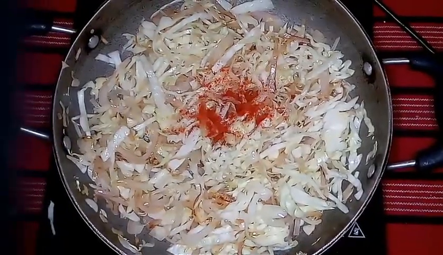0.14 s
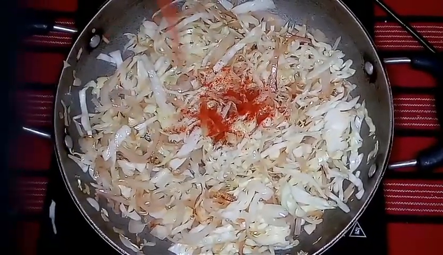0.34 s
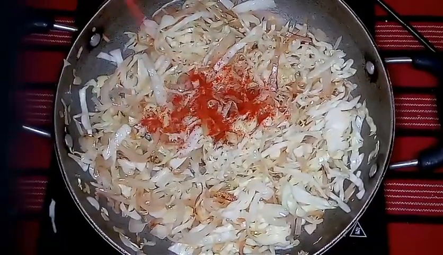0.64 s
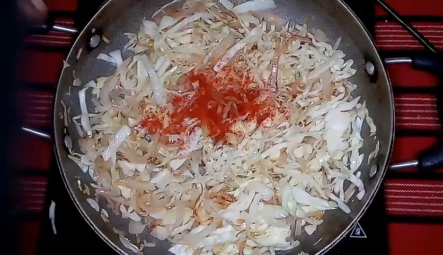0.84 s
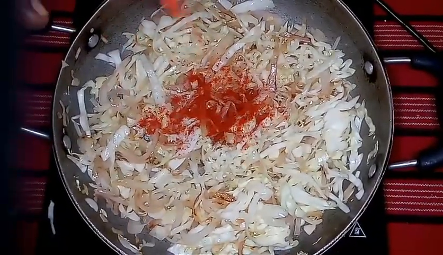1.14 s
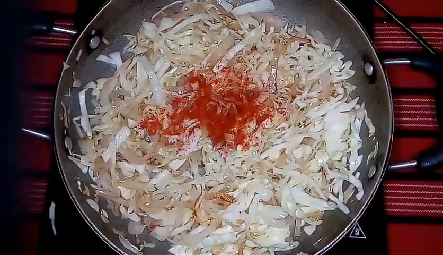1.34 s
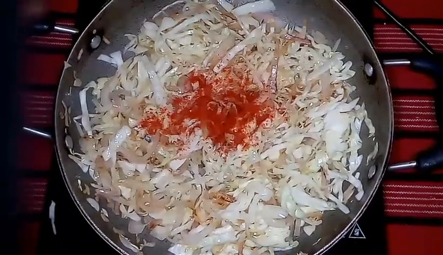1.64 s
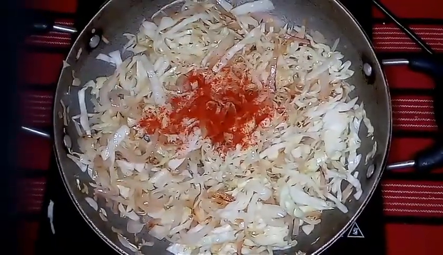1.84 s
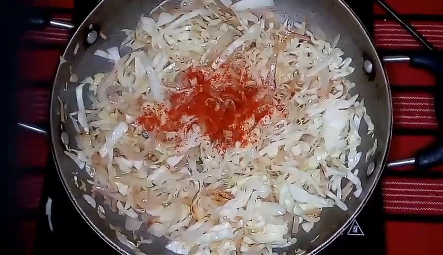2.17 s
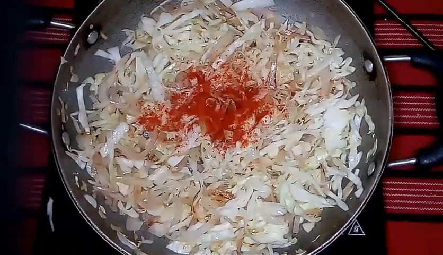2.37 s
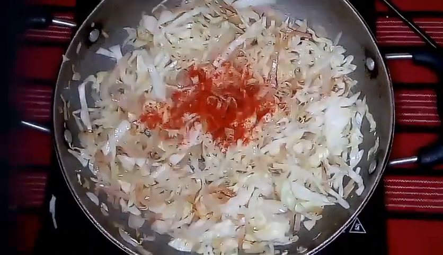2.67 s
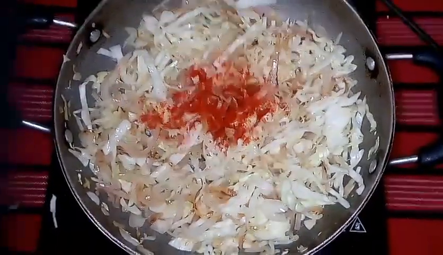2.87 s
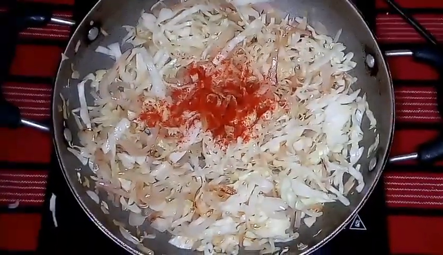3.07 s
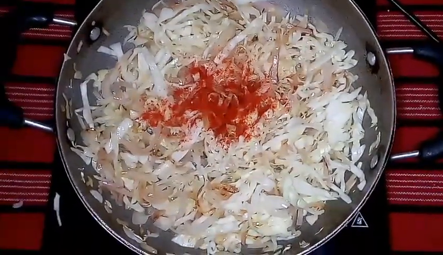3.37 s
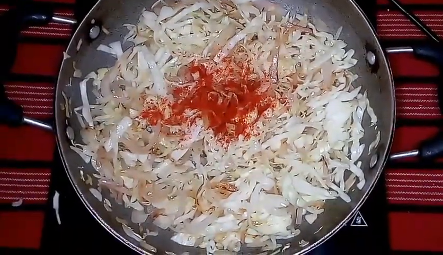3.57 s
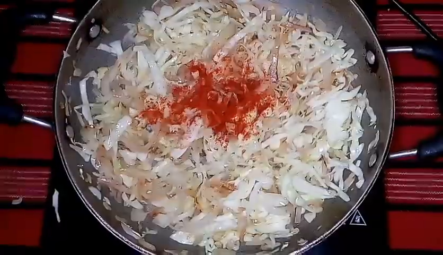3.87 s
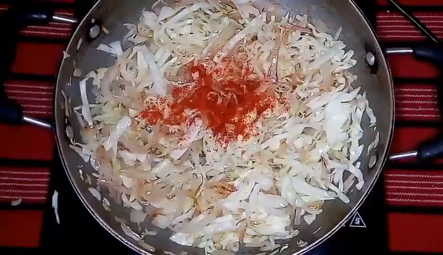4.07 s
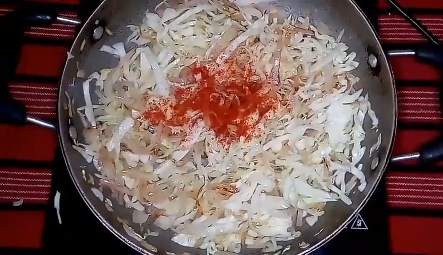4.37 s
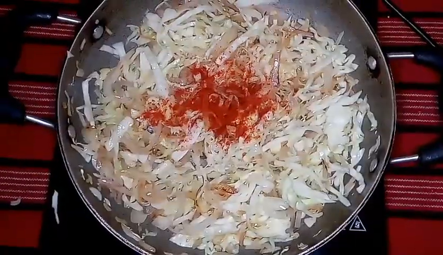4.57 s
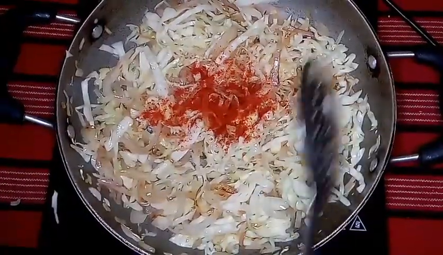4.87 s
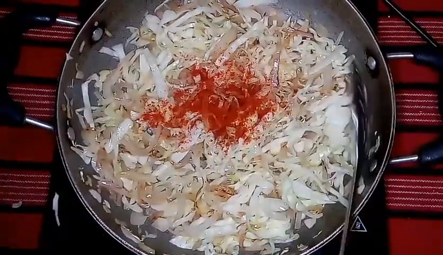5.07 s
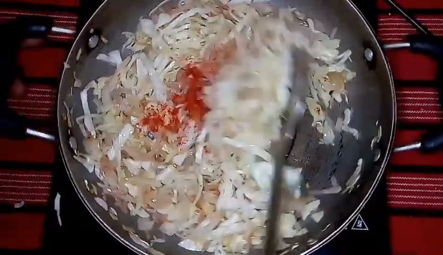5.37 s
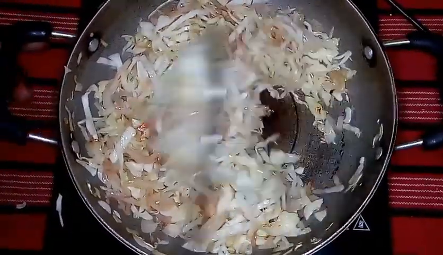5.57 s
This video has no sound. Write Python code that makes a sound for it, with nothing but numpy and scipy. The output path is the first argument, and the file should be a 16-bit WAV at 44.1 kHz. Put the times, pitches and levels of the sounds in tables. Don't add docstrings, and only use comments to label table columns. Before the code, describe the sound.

A steady kitchen bed: low coil hum, hollow fan airflow and dense bright frying, heard in mono by one close microphone with little room sound. Sharp fat pops come singly and in small clusters, with a few dull bumps midway. In the last half second a metal utensil hits the pan, rattles briefly, slides with low knocks and shoves food over hot steel.

```python
import sys
import numpy as np
from scipy import signal
from scipy.fft import rfft, irfft, next_fast_len
from scipy.io import wavfile

SR = 44100
rng = np.random.default_rng(int(sys.argv[2]) if len(sys.argv) > 2 else 0)


def log_audio(samples):
    frames = np.atleast_2d(samples).T
    limited = np.clip(frames, -1, 1)
    pcm = np.round(limited * 32767).astype(np.int16)
    wavfile.write(sys.argv[1], SR, pcm)


N = 252290

SLIDE_START_S = 5.25

# pitch in Hz, level in dB, 60 dB decay in seconds.
PAN_MODES = [(678, 1, 0.036), (900, -5.5, 0.035), (1060, -9, 0.068), (1207, -2, 0.052), (1347, -3, 0.04),
             (1542, -11, 0.12), (1990, -5, 0.057), (2170, -6.5, 0.054)]


def undb(db):
    return 10 ** (np.asarray(db) / 20)


def rms_one(x):
    return x / np.sqrt(np.mean(x ** 2) + 1e-20)


def in_time(rows):
    s, *columns = np.transpose(rows)
    return [np.interp(np.arange(N) / SR, s, c) for c in columns]


def drift(rate_hz):
    r = np.exp(-2 * np.pi * rate_hz * 40 / SR)
    noise = rng.standard_normal(N // 40 + 2002)
    slow = signal.lfilter([1], [1, -2 * r, r * r], noise)[2000:]
    return np.interp(np.arange(N) / 40, np.arange(len(slow)), rms_one(slow))


def colour(x, spectrum):
    size = next_fast_len(N)
    hz, db = np.transpose(spectrum)
    log_hz = np.log(np.fft.rfftfreq(size, 1 / SR) + 1)
    gain = undb(np.interp(log_hz, np.log(hz), db))
    return rms_one(irfft(rfft(x, size) * gain, size)[:N])


def resonance(x, hz, width_hz):
    r = np.exp(-np.pi * width_hz / SR)
    feedback = [1, -2 * r * np.cos(2 * np.pi * hz / SR), r * r]
    return signal.lfilter(np.array([1, 0, -1]) * (1 - r * r) / 2, feedback, x)


def ring(clicks, hz, t60):
    r = undb(-60 / (t60 * SR))
    w = 2 * np.pi * hz / SR
    return signal.lfilter([0, np.sin(w)], [1, -2 * r * np.cos(w), r * r], clicks + 1e-18)


def grains(per_s, spread_db):
    sizes = undb(spread_db * np.minimum(rng.exponential(1, N), 5)) * rng.choice([-1, 1], N)
    return sizes * (rng.random(N) < per_s / SR)


def knock(db, hz, swell_ms):
    t = np.arange(round(0.15 * SR)) / SR
    u = t * 1000 / swell_ms
    return undb(db) * u * np.exp(1 - u) * np.sin(2 * np.pi * hz * t)


def tone(hz, wobble_hz):
    cycles = np.cumsum(hz + wobble_hz * drift(2.82)) / SR
    return np.sqrt(2) * np.sin(2 * np.pi * (cycles + rng.random()))


def soften(x, low_hz, high_hz):
    return signal.sosfilt(signal.butter(3, [low_hz, high_hz], "band", fs=SR, output="sos"), x)


def place(sound, s):
    return np.pad(sound, (round(s * SR), N))[:N]


def coil_hum():
    # time in seconds, hum level in dB.
    coil = [(0.0, -39.5), (2.2, -40), (2.35, -42), (2.6, -40.5), (3.5, -42), (4.3, -42), (4.9, -41),
            (5.21, -40), (5.28, -48.5), (5.36, -38.5), (5.45, -45.5), (5.64, -45.5), (5.72, -39)]
    hum_db, = in_time(coil)
    return undb(hum_db + 0.2 * drift(2.1)) * tone(100, wobble_hz=0.11)


def fan():
    # frequency in Hz, level in dB per Hz.
    air_spectrum = [(12, -65), (20, -31), (43, -18), (63, -18.5), (97, -8), (123, -10), (149, -15.5),
                    (193, -14.5), (325, -15), (403, -16), (479, -9.5), (546, -13), (1140, -18.5),
                    (1470, -48), (3500, -19), (4550, -59), (7700, -120)]
    # pitch in Hz, width in Hz, level in dB.
    cavities = [(330, 20, 13.5), (369, 11, 8), (400, 11, 1.5), (451.6, 27, 2.5), (500, 53, 2),
                (611, 57, -0.5), (767, 38, -0.5), (840, 8.6, -19), (944, 24, -4.5), (1025, 21, 2),
                (1430, 43, -5)]
    # pitch in Hz, width in Hz, share removed from 0 to 1.
    swallowing = (539, 23, 1)
    steady_hz = [128, 147, 1129]
    # level in dB, pitch wobble in Hz.
    steady_tones = [(-66, 2.4), (-61.5, 0.76), (-62.5, 1.63)]
    blade_levels = [-68, -60, -68.5, -69]
    blade_hz = 247.1

    air = colour(rng.standard_normal(N), air_spectrum)
    air = air + sum(undb(db) * resonance(air, hz, width) for hz, width, db in cavities)
    dip_hz, dip_width, share = swallowing
    air = air - np.clip(share, 0, 1) * resonance(air, dip_hz, dip_width)

    lines = [(hz, db, wobble) for hz, (db, wobble) in zip(steady_hz, steady_tones)]
    lines += [(blade_hz * (k + 1), db, 1.2) for k, db in enumerate(blade_levels)]
    tones = sum(undb(db + 1.2 * drift(1.9)) * tone(hz, wobble) for hz, db, wobble in lines)
    return undb(-47 + 0.77 * drift(8.5)) * rms_one(air) + tones


def sizzle():
    # time in seconds, sizzle level in dB.
    frying = [(0.0, -38.5), (0.6, -38.5), (1.4, -39.5), (2.5, -39.5), (3.1, -38.5), (4.1, -39.5),
              (4.9, -39), (5.2, -38.5), (5.72, -37.5)]
    # frequency in Hz, level in dB per Hz.
    sizzle_spectrum = [(760, -31), (1300, -12), (1470, -18), (1910, -15.5), (2320, -16), (3070, -12),
                       (3410, -9), (4370, -1.5), (6090, 0.5), (6620, -3), (8060, -14.5), (11800, -29.5),
                       (13700, -33.5), (15500, -43)]
    sizzle_db, = in_time(frying)

    bared = np.clip((np.arange(N) / SR - 5.35) / 0.15, 0, 1)
    sparkle_db = 5 * bared + 2.3 * drift(12.0)

    flurry = drift(12.0)
    common = rms_one(grains(7000, spread_db=4.4))
    edges_hz = np.geomspace(700, 17000, 10)
    fizz = 0
    for low_hz, high_hz in zip(edges_hz, edges_hz[1:]):
        source = common + rms_one(grains(6000, spread_db=2.0))
        band_filter = signal.butter(2, [low_hz, high_hz], "band", fs=SR, output="sos")
        swing_db = 0.42 * flurry + 0.16 * drift(8.3) * np.log(low_hz / 600)
        swing_db = swing_db + sparkle_db * (low_hz > 10000)
        fizz = fizz + undb(swing_db) * signal.sosfilt(band_filter, source)

    pops = grains(900, spread_db=2.5)
    dealt = rng.integers(0, 24, N)
    rings = 0
    for k, hz in enumerate(np.geomspace(1500, 14000, 24)):
        rings = rings + ring(pops * (dealt == k), hz, t60=176 / hz) * np.sqrt(hz)
    return undb(sizzle_db) * colour(rms_one(fizz) + undb(-12) * rms_one(rings), sizzle_spectrum)


def spits():
    # start in seconds, peak level in dB, pitch in Hz.
    drops = [(0.2003, -28, 6410), (0.3476, -21, 4800), (0.494, -26, 3600), (0.4526, -18, 6030),
             (0.641, -23, 5490), (0.699, -20, 5460), (0.8377, -23, 4780), (0.94, -24, 5600),
             (1.4643, -24, 6330), (1.632, -24, 5400), (2.0844, -16.5, 5600), (2.2444, -24, 5430),
             (2.2934, -24, 5400), (2.343, -22, 5230), (2.3891, -16, 5550), (3.1297, -28, 5720),
             (3.1926, -21, 4900), (3.358, -17, 5600), (3.46, -19, 6300), (3.4955, -21, 5330),
             (3.925, -21, 5770), (4.462, -21, 6200), (4.485, -22, 5600), (5.2542, -11.5, 5300),
             (5.3542, -23, 5850), (5.4257, -20, 4170), (5.4383, -26, 6420), (5.5702, -30, 4600),
             (5.5799, -22, 5140), (5.6829, -23, 5060)]
    puff_ms = 1.6
    out = 0
    for s, db, hz in drops:
        crack = knock(db - 0.6, hz, swell_ms=0.12)
        t_ms = np.arange(len(crack)) / SR * 1000
        puff = undb(db - 13) * rng.standard_normal(len(crack)) * np.exp(-t_ms / puff_ms)
        edge_db = db - 30 + 1.5 * (s > SLIDE_START_S)
        edge = knock(edge_db, 11500, swell_ms=0.035)
        out = out + place(soften(crack, 1900, 8600) + soften(puff, 4200, 5500) + edge, s)
    return out


def pushes():
    # start in seconds, peak level in dB, pitch in Hz, swell in ms.
    thuds = [(2.085, -42, 432, 9.2), (3.075, -40, 320, 4.9), (5.22, -46.5, 200, 20.0),
             (4.043, -37.5, 373, 3.1), (4.334, -36, 277, 2.6), (5.190, -18.5, 438, 5.2),
             (5.204, -24.5, 405, 5.1), (5.2235, -25, 5023, 1.6), (5.21, -52, 45, 30.0),
             (5.392, -33.5, 88, 9.1), (5.39, -43, 206, 14)]
    return sum(place(knock(db, hz, swell_ms), s) for s, db, hz, swell_ms in thuds)


def blows():
    # start in seconds, body level in dB, clink level in dB, chatter in ms.
    strikes = [
        (5.186, -32.5, -24.5, 4.1),
        (5.204, -35, -35, 4.5),
        (5.2237, -35, -25.5, 1.2),
        (5.379, -51, -42, 2),
        (5.396, -36.5, -38, 4.8),
    ]
    # pitch in Hz, level in dB, 60 dB decay in seconds.
    rim_modes = [(2540, -9, .012), (4400, -1, 0.0069), (5023, -8, 0.04), (5650, 2, 0.014),
                 (6300, -11, 0.014), (7260, -9, 0.018), (8960, -16.5, 0.012)]
    out = 0
    for s, body_db, clink_db, chatter_ms in strikes:
        t_ms = np.arange(round(0.3 * SR)) / SR * 1000
        chatter = rng.standard_normal(len(t_ms)) * np.exp(-t_ms / chatter_ms)
        chatter = chatter / np.sqrt(np.sum(chatter ** 2))
        body = sum(undb(body_db + db + rng.normal(0, 0.8)) * ring(chatter, hz, t60)
                   for hz, db, t60 in PAN_MODES)
        clink = sum(undb(clink_db + db + rng.normal(0, 2.3)) * ring(chatter, hz, t60)
                    for hz, db, t60 in rim_modes)
        out = out + place(body + clink, s)
    return soften(out, 740, 9800)


def blade_slips():
    # start in seconds, peak level in dB, pitch in Hz.
    releases = [
        (5.223, -30, 486),
        (5.243, -36, 384),
        (5.265, -35.5, 483),
        (5.293, -37, 433),
        (5.319, -33.5, 500),
        (5.345, -32, 433),
        (5.376, -28.5, 330),
    ]
    return sum(place(knock(db, hz, swell_ms=9.8), s) for s, db, hz in releases)


def stroke():
    # time in seconds, rustle level in dB.
    turning = [(5.25, -38), (5.285, -45), (5.35, -35.5), (5.375, -38.5), (5.43, -31), (5.47, -39),
               (5.54, -49), (5.58, -40.5), (5.72, -52)]
    # frequency in Hz, level in dB per Hz.
    rustle_spectrum = [(760, -44), (1300, -19), (1490, -26), (2090, -13), (3170, -13.5), (4070, -7.5),
                       (5610, -2.5), (6480, -6.5), (10800, -31.5), (15500, -40)]
    slide_end_s, attack_s = 5.36, 0.0085
    t = np.arange(N) / SR
    rustle_db, = in_time(turning)

    rumble_db = -39 - 87 * np.maximum(t - slide_end_s, 0)
    rumble_hz = 451.5 - 59.5 * np.maximum(t - SLIDE_START_S, 0)
    phase = 2 * np.pi * np.cumsum(rumble_hz) / SR
    rumble = rms_one(drift(59.0) * np.cos(phase) + drift(45.0) * np.sin(phase))

    stutter = grains(2500, spread_db=1.5)
    modes = sum(undb(db) * ring(stutter, hz, 0.78 * t60) for hz, db, t60 in PAN_MODES)
    grating = rms_one(modes + 53 * resonance(stutter, 1080, 90))

    rustle = colour(grains(7000 * undb(3 * drift(60.0)), spread_db=3.5), rustle_spectrum)
    food = undb(rustle_db) * (rustle + undb(-14) * grating)
    moving = np.clip((t - SLIDE_START_S) / attack_s, 0, 1)
    return moving * (undb(rumble_db) * rumble + food)


def scene():
    steady = coil_hum() + fan() + sizzle()
    mono = steady + spits() + pushes() + blows() + blade_slips() + stroke()
    return np.stack([mono, mono])


def roll_off(x):
    return signal.sosfilt(signal.butter(12, 15600, fs=SR, output="sos"), x)


def record(dry):
    top_hz = 15600
    edge = signal.cheby2(10, 40, 1.03 * top_hz, fs=SR, output="sos")
    mix = signal.sosfilt(edge, dry)
    return roll_off(mix)


dry = scene()
out = record(dry)
log_audio(out)
```